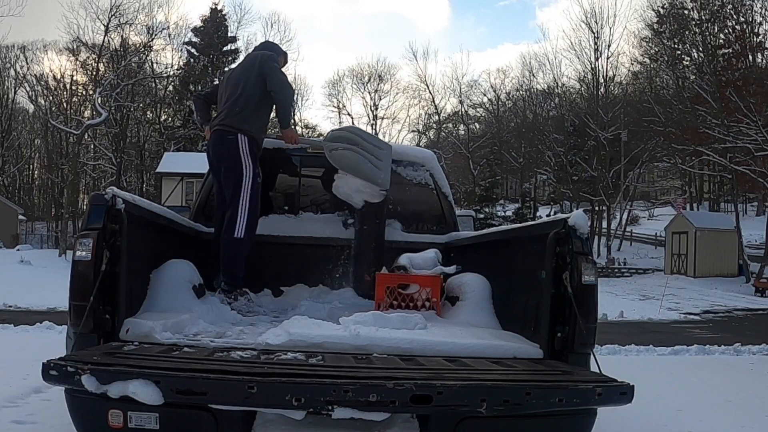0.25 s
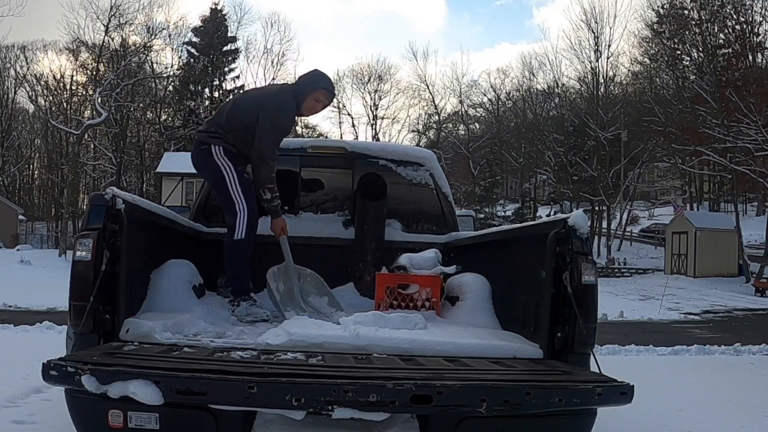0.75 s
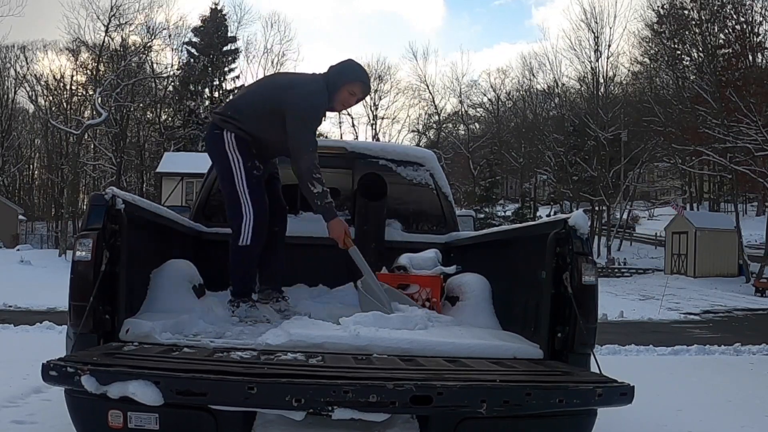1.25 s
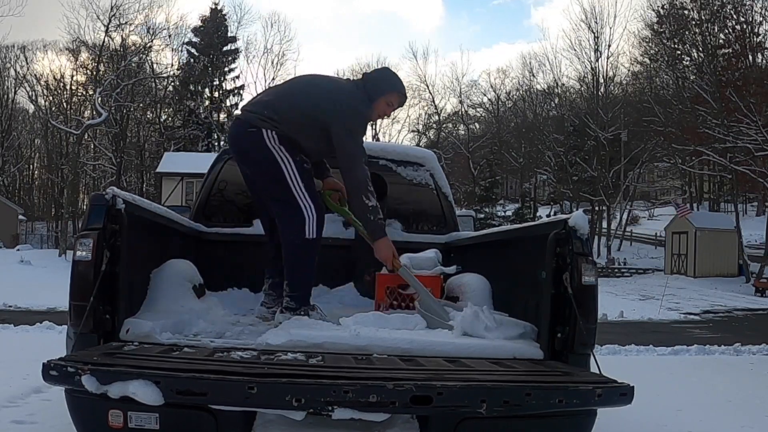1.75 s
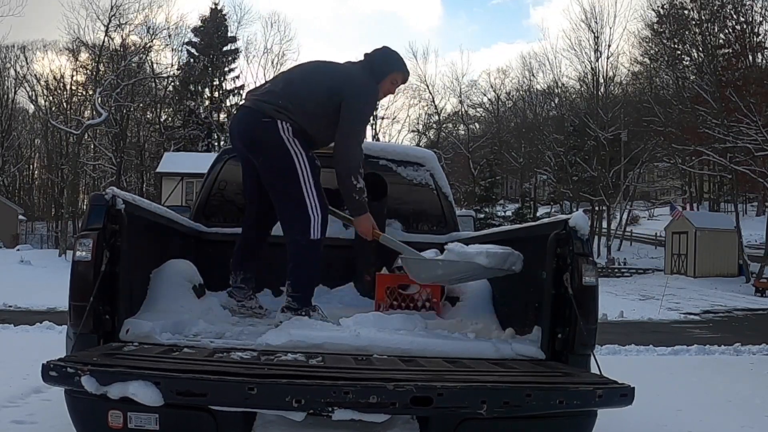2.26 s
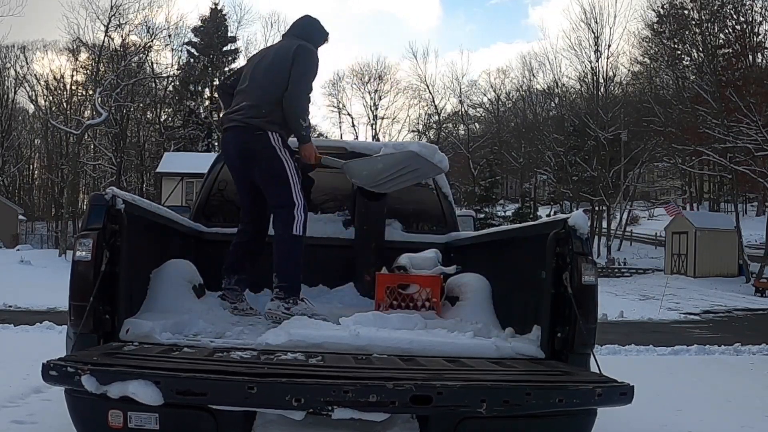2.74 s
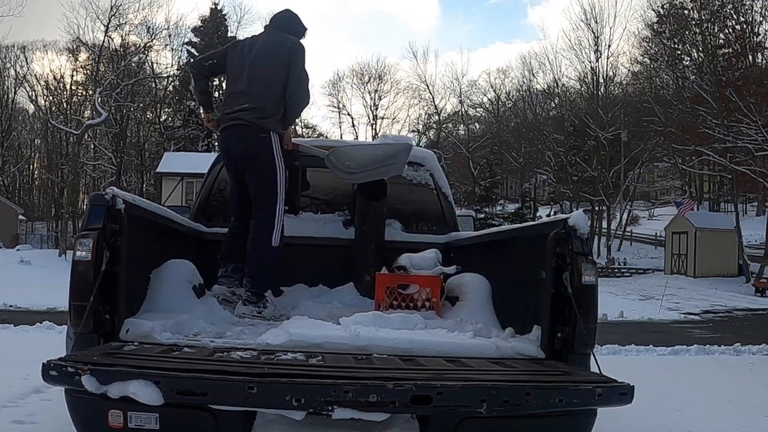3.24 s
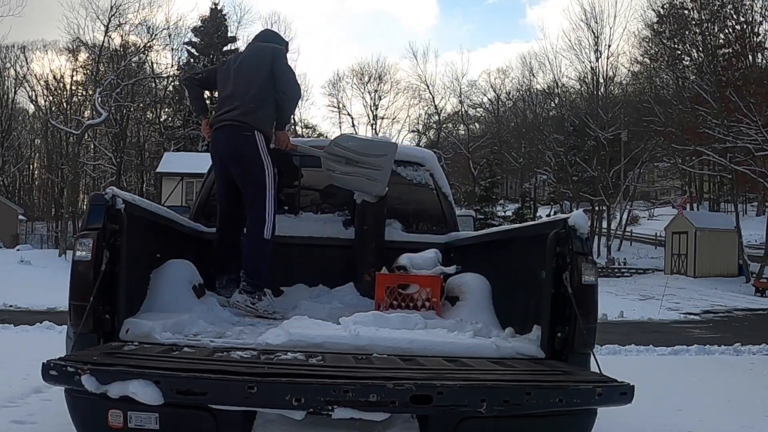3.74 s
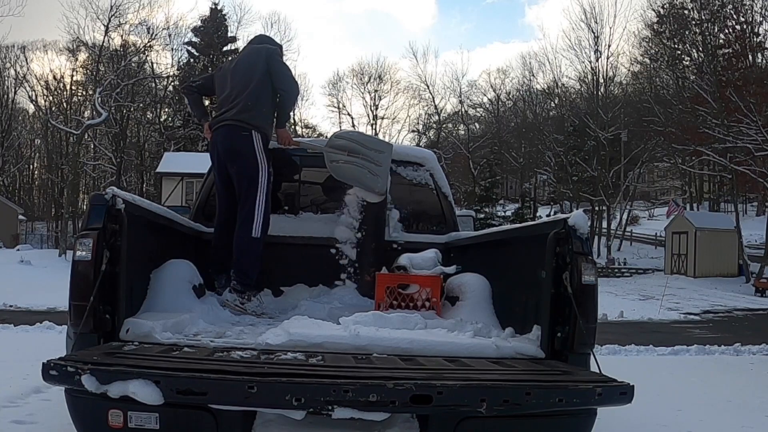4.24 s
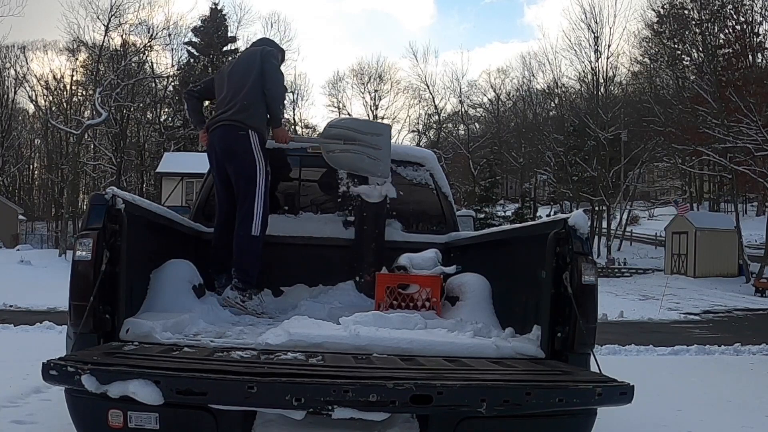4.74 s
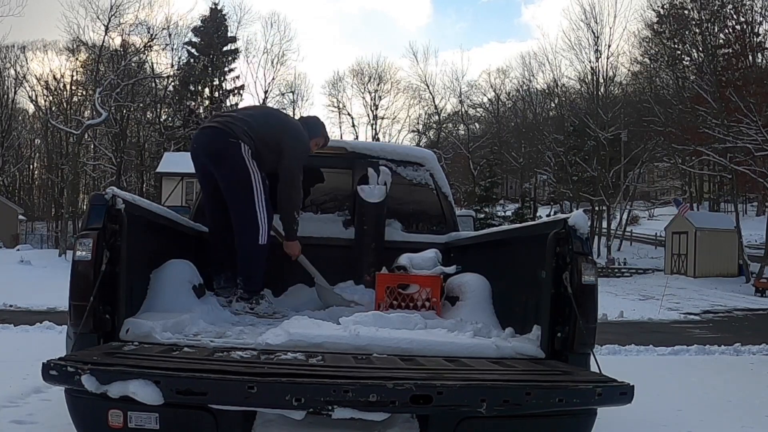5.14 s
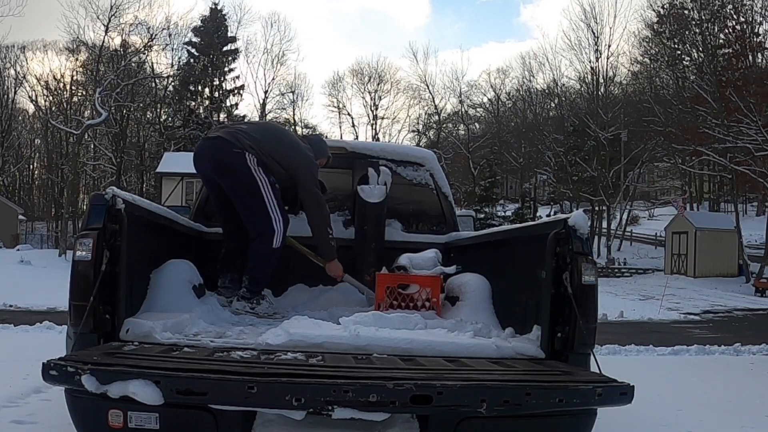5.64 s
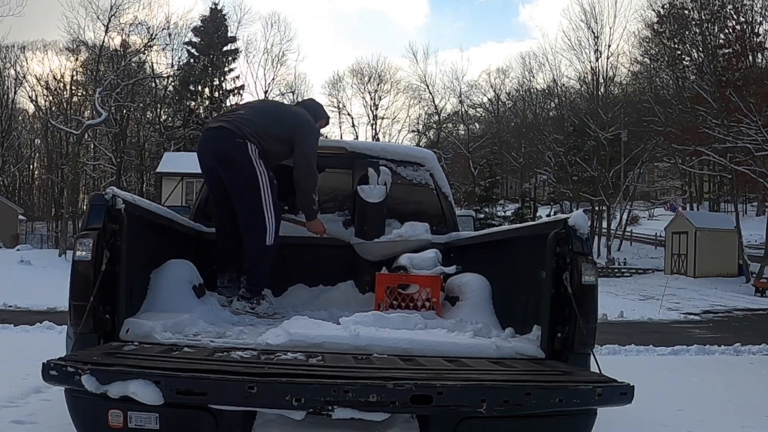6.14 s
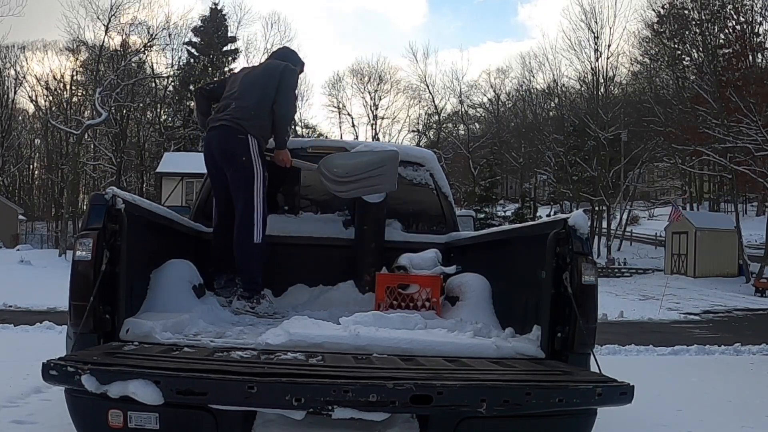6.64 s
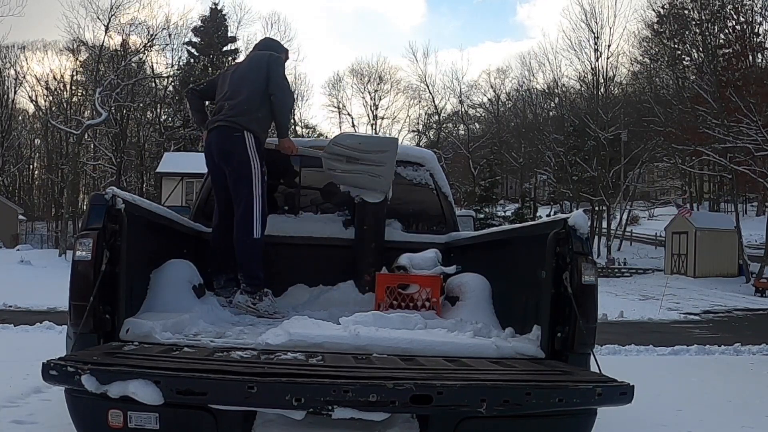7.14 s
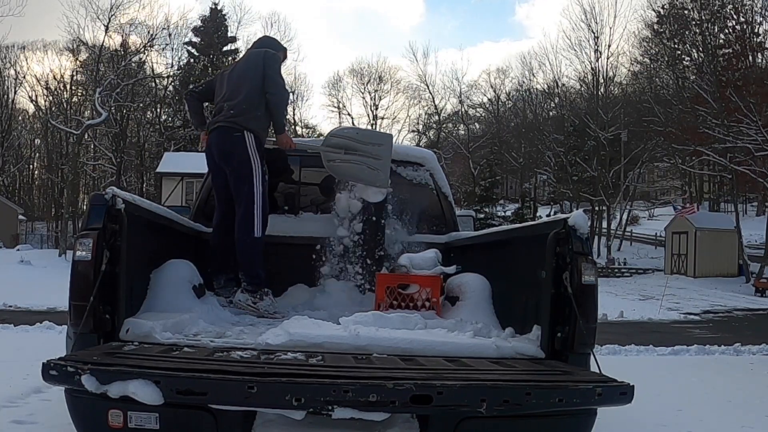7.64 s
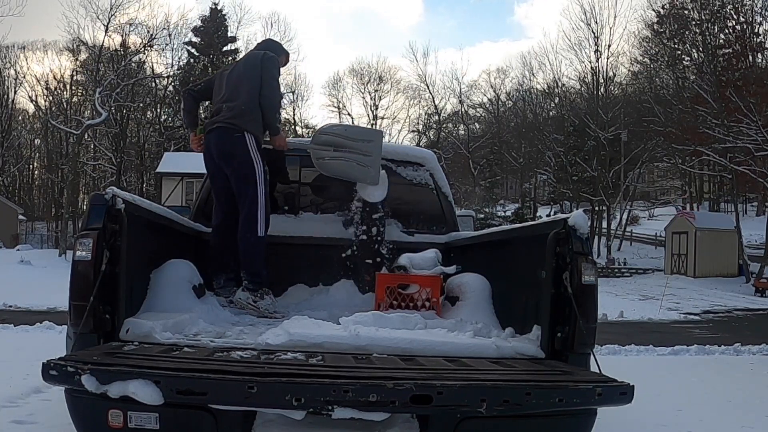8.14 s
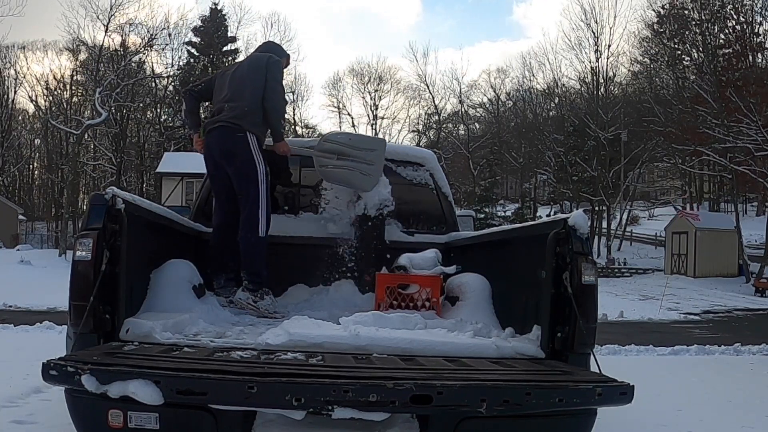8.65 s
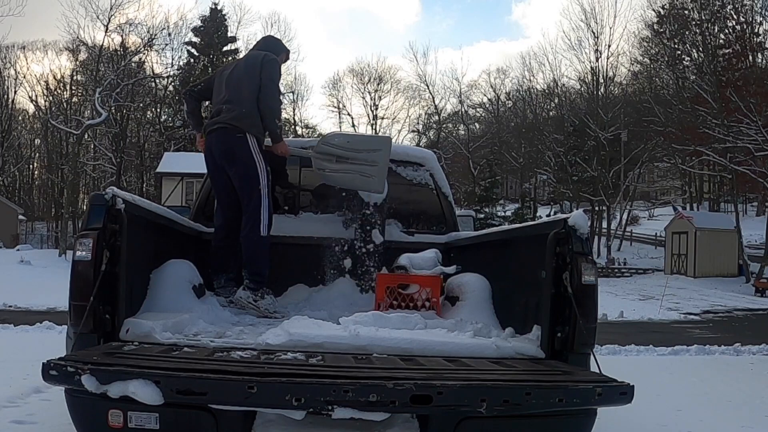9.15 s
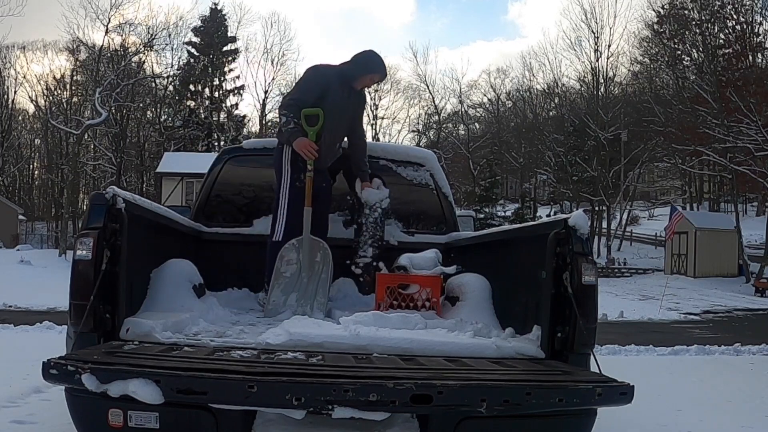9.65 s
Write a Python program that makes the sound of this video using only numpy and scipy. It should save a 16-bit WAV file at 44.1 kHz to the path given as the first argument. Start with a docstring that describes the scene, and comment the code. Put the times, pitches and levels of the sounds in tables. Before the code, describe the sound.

Outdoors in gusty wind, a shovel bites and drags through packed snow on ribbed steel, with dull thuds, clanking knocks and sifting snow.

```python
"""Gusts buffet the microphone first, while tyre roar from a car on a far road swells briefly and fades.
A metal shovel then bites into packed snow on a ribbed truck bed, scrapes it up and is knocked on a steel pipe.
Scrapes and knocks are noise taps and decaying sine rings; loose snow sifts down as grainy noise.
Wind is low noise in lumps with single slow swings; road and still air are shaped noise."""
import sys
import numpy as np
from scipy import signal
from scipy.fft import rfft, irfft, next_fast_len
from scipy.io import wavfile
from scipy.ndimage import uniform_filter1d

SR = 44100
rng = np.random.default_rng(int(sys.argv[2]) if len(sys.argv) > 2 else 0)


def wav_record(signal):
    """Record a signal, one row per channel, as 16-bit PCM in the file named by sys.argv[1]."""
    frames = np.transpose(np.atleast_2d(signal))
    bounded = np.clip(frames, -1, 1)
    # unit amplitude maps onto the largest positive 16-bit level
    quanta = np.round(bounded * 32767).astype(np.int16)
    wavfile.write(sys.argv[1], SR, quanta)


N = 436149  # length in samples

# The sliding blade, one table a stroke, with the snow settling after it:
# t/s, pressure on the snow level/dB, contact with the steel level/dB (relative to the pressure)
SLIDE_STROKES = [
    [(.8, -33, 2), (.87, -42.5, 18), (1.0, -32.5, 9.5), (1.14, -37, 9), (1.22, -39, -1), (1.4, -40.5, 2.5),
     (1.55, -39, -3.5), (1.7, -43, -1.5), (1.82, -37, -2), (1.92, -42, -11), (1.97, -55, -11),
     (2.1, -86, -3)],
    [(4.985, -37, 2), (5.07, -38, 5), (5.3, -32.5, -3.5), (5.5, -39, 0.5), (5.69, -47.5, 1),
     (5.76, -50, 3.5), (5.95, -56.5, -10), (6.3, -58, -13)],
]
# Shares of the slide: bed and blade level/dB (relative to contact), grit and fine grit level/dB (to pressure)
SLIDE_SHARES = [-3, -4.5, -1, -10]
# The edge bites a rib or a crust: t/s, length t/s, then bed, blade and grit level/dB before the bite's fall
EDGE_BITES = [(0.802, 0.023, -15, -12, -27.5), (0.829, 0.024, -15, -15.5, -22),
              (0.881, 0.037, -35, -17.5, -27.5), (0.897, 0.074, -20.5, -20, -31),
              (1.024, 0.014, -33, -20.5, -32), (1.04, 0.011, -20, -24, -22.5),
              (1.063, 0.015, -20, -15.5, -17.5), (1.09, 0.019, -37, -28, -24),
              (1.164, 0.026, -22, -29.5, -42), (1.236, 0.0067, -34, -29, -32.5),
              (1.305, 0.06, -41, -43, -33.5), (1.399, 0.011, -33, -35.5, -43),
              (1.843, 0.031, -28, -33.5, -63), (1.873, 0.026, -28.5, -37, -47),
              (1.904, 0.043, -31, -42, -53), (3.271, 0.012, -33.5, -25, -29.5),
              (3.288, 0.012, -42, -46, -37), (3.305, 0.018, -48, -44, -47), (4.988, 0.016, -30, -27, -41),
              (5.002, 0.028, -32, -21, -33), (5.029, 0.037, -26.5, -16.5, -27),
              (5.106, 0.022, -25, -19.5, -33.5), (5.16, 0.019, -39, -18.5, -29),
              (5.218, 0.036, -28, -22.5, -22.5), (5.26, 0.024, -30, -29.5, -27.5),
              (5.304, 0.055, -36, -27.5, -36.5), (5.38, 0.065, -54, -35, -33.5),
              (5.443, 0.037, -48, -35, -31), (5.516, 0.062, -42, -30.5, -29),
              (5.566, 0.036, -35.5, -30, -23), (5.61, 0.027, -43, -32, -35), (5.665, 0.038, -32, -33, -34)]
# Colour of crushed ice crystals: f/Hz, relative level/dB (per Hz)
ICE_GRIT = [(530, -15.5), (900, -4), (1960, -6.5), (2130, -9.5), (2690, -7.5), (4060, -12), (4500, -14.5),
            (5500, -18.5), (9150, -23.5), (12000, -42), (15000, -51)]
# How the truck bed rings: f/Hz, relative level/dB, time to fall 60 dB t/s
BED_RINGS = [(170, -2, 0.023), (244, 1, 0.034), (322, -3, 0.047), (413.6, -2.5, 0.047)]
# How the shovel blade rings, here and in the blows: f/Hz, relative level/dB, time to fall 60 dB t/s
BLADE_RINGS = [(550, 1.5, 0.029), (629, 1, 0.054), (732, 2.5, 0.018), (833, -6, 0.057), (933, -2, 0.016),
               (1193, -3.5, 0.021), (1305, -7, 0.031), (1454, -12, 0.036), (1710, -15.5, 0.027),
               (1910, -8.5, 0.0096), (2212, -20, 0.067), (3470, -38, 0.02), (4170, -41, 0.022)]


def scrape():
    """Cracking crystals tap the bed and the blade, which ring on, while crushed snow gives off grit noise."""
    bite_fine_db, bite_fall_db_per_s, bite_release_s = -15, 126, 0.0081  # fine grit is relative to grit
    # four rows of force: bed, blade, grit, fine grit
    force = np.zeros((4, N))
    for stroke in SLIDE_STROKES:
        snow_db, steel_db = curve(stroke)
        contact_db = snow_db + steel_db
        force += undb([contact_db, contact_db, snow_db, snow_db])
    force *= undb(SLIDE_SHARES)[:, None]

    t = np.arange(N) / SR
    rise = np.array([[.15], [.14], [.45], [.8]])  # share of the bite; the fine grit builds last
    for s, length, bed_db, blade_db, grit_db in EDGE_BITES:
        span = slice(int(s * SR), int((s + length + .15) * SR))
        u = t[span] - s
        grip = np.clip(u / (rise * length), 0, 1)
        grip = grip * undb(-bite_fall_db_per_s * np.clip(u, 0, length))
        release = np.exp(-np.clip(u - length, 0, None) / bite_release_s)
        parts = undb([bed_db, blade_db, grit_db, grit_db + bite_fine_db])[:, None]
        force[:, span] += parts * grip * release

    chatter = walk(90.)  # the edge sticks and slips
    blade_cracks = unit(undb(1.26 * chatter) * grains(1.95))
    bed_cracks = unit(undb(0.43 * chatter) * grains(2.24))
    crushed = unit(grains(2.9)) + .5 * rng.standard_normal(N)
    grit, fine = split(colour(undb(1.2 * chatter) * crushed, ICE_GRIT), 5000)

    # crystals of each size break in their own clusters
    edges_hz = 400 * 1.4 ** np.arange(10)
    clusters = np.zeros(N)
    for pair in zip(edges_hz, edges_hz[1:]):
        sos = signal.butter(2, pair, "band", fs=SR, output="sos")
        clusters += undb(1.3 * walk(160.)) * signal.sosfiltfilt(sos, grit)
    grit = unit(clusters)
    fine = unit(undb(2. * walk(40.)) * fine)  # powder squeezes out in its own time

    bed = struck(force[0] * bed_cracks, BED_RINGS)
    blade = struck(force[1] * blade_cracks, BLADE_RINGS)
    return bed + blade + force[2] * grit + force[3] * fine


# Boots and blade thud on the steel: t/s, level/dB (before the soft onset), f/Hz
STEEL_THUDS = [(0.352, -10, 273), (2.638, -17, 256), (3.037, -9, 291), (3.276, -14, 235), (3.794, -19, 288),
               (3.822, -17, 281), (7.1822, -5.5, 236), (7.202, -19, 257), (8.627, -2, 289),
               (8.641, -13, 267)]


def thuds():
    """A hollow knock of steel: a low ring and a weaker overtone, both short, with a soft start."""
    out, t = np.zeros(N), np.arange(SR // 4) / SR
    for s, db, hz in STEEL_THUDS:
        overtone = 0.27 * ring(t, 1.72 * hz, 0.034)
        thud = (overtone - ring(t, hz, 0.039)) * (1 - np.exp(-t / 0.0028))
        out[int(s * SR):int(s * SR) + len(t)] += undb(db) * thud
    return out


# The blade strikes the pipe: t/s, then blade, pipe and snow crunch level/dB (before their own
# rise and fade), crunch time scale t/s (60 dB down by then)
PIPE_BLOWS = [(7.182, -21.5, -36, -36, 0.033), (7.202, -36, -55, -40, 0.078),
              (8.628, -17, -8, -21.5, 0.042), (8.641, -15, -32, -28, 0.07)]
# How the pipe rings before the snow chokes it: f/Hz, relative level/dB, time to fall 60 dB t/s
PIPE_RINGS = [(1045, 0, .11), (1367, -8, .05), (1810, -13, .04), (2600, -17, .03)]


def blows():
    """Blade and pipe ring briefly together, and the knock shakes loose a crunch of snow."""
    out, t = np.zeros(N), np.arange(SR // 4) / SR
    crunch = colour(grains(1.8), ICE_GRIT)
    # the wall swings up, then snow inside chokes it
    pipe = modes(PIPE_RINGS) * (1 - np.exp(-t / 0.0024)) * np.exp(-(t / 0.026) ** 2)
    blade = np.gradient(modes(BLADE_RINGS))  # a blow on hard steel is sudden and favours the high modes
    blade = blade / np.max(np.abs(blade))
    blade = blade * (1 - np.exp(-t / 0.00031)) * np.exp(-t / 0.02)  # snow on the blade deadens it
    for s, blade_db, pipe_db, crunch_db, crunch_t60 in PIPE_BLOWS:
        span = slice(int(s * SR), int(s * SR) + len(t))
        fade = np.exp(-np.log(1000) * (t / crunch_t60) ** 1.16) * (1 - np.exp(-t / 0.002))
        out[span] += undb(blade_db) * blade + undb(pipe_db) * pipe
        out[span] += undb(crunch_db) * fade * crunch[span]
    return out


# The bare edge clicks on steel: t/s, level/dB (before the onset), f/Hz
EDGE_TICKS = [(0.85, -9.5, 3480), (1.041, -8, 3000), (1.048, -16, 3400), (1.069, -7, 2750),
              (1.077, -4, 3870), (1.239, -19, 2790), (5.038, -17, 2300), (5.117, -25, 3800),
              (5.168, -25, 3000), (5.222, -21, 2630), (5.444, -17, 2000), (5.57, -12, 1660),
              (5.579, -21, 2970), (7.182, -31, 2920), (8.627, -11, 3420), (8.627, -15, 4780)]
# The upper ring of a click: multiple of its f/Hz, relative level/dB
UPPER_RING = (1.9, -20)


def ticks():
    """Two quick high rings make each click; a higher pitch dies away sooner."""
    out, t = np.zeros(N), np.arange(SR // 4) / SR
    multiple, upper_db = UPPER_RING
    for s, db, hz in EDGE_TICKS:
        t60 = 24 / hz  # 24 cycles until the ring is 60 dB down
        tick = ring(t, hz, t60) + undb(upper_db) * ring(t, multiple * hz, t60)
        out[int(s * SR):int(s * SR) + len(t)] += undb(db) * tick * (1 - np.exp(-t / 0.00071))
    return out


def knocks():
    """Thuds, blows and clicks, and their faint smeared return from a house front."""
    delay_s, smear_s, house_db = .092, .013, -41  # the return peaks one smear after the delay
    out, t = thuds() + blows() + ticks(), np.arange(SR // 4) / SR
    front = band(rng.standard_normal(len(t)), 520.0, 1800.0)
    front = front * np.exp(-((t - delay_s - smear_s) / smear_s) ** 2)
    return out + undb(house_db) * through(out, front)


# Loose snow sifting off the blade: start t/s, length t/s, then clumps, crumbs and powder level/dB
SNOW_FALLS = [(2.802, 0.13, -50, -64, -76), (3.033, 0.13, -44.5, -58, -68), (3.71, 0.28, -49.5, -64, -62),
              (3.971, 0.14, -49, -58.5, -56.5), (4.102, 0.25, -50.5, -59, -60.5),
              (4.688, 0.09, -50.5, -59, -64), (9.466, 0.194, -52.5, -60, -84), (9.673, 0.2, -72, -68, -63)]


def sifting():
    """Clumps plop, crumbs patter and powder hisses: each is grainy noise in its own pitch range."""
    t = np.arange(N) / SR
    rise_s, fade_s = 0.033, 0.12
    levels = np.zeros((3, N))
    for s, length, *parts_db in SNOW_FALLS:
        # each ramp is halfway at the listed start or end
        ramps = np.minimum((t - s) / rise_s, (s + length - t) / fade_s)
        levels += undb(parts_db)[:, None] * np.clip(ramps + .5, 0, 1)
    clumps, crumbs, fine = levels
    powder = grains(2.5)
    hiss = band(powder, 4000.0, 8300.0) + 0.27 * band(powder, 7200.0, 8200.0)
    plops = clumps * band(grains(2.25), 240.0, 1150.0)
    patter = crumbs * band(grains(1.9), 2370.0, 3860.0)
    return undb(0.66 * walk(27.0)) * (plops + patter + fine * unit(hiss))


def truck_wash(work):
    """The bed walls and the cab send back a short dull wash, starting 6 ms late."""
    t = np.arange(SR // 5) / SR
    wash = band(rng.standard_normal(len(t)), 133.0, 2500.0, order=1)
    wash = wash * np.exp(-np.log(1000) * t / 0.15) * (t > .006)
    return undb(-23.5) * through(work, wash)


# Gusts at the microphone: t/s, rumble level/dB, upper rumble level/dB (relative to the rumble)
WIND_GUSTS = [(0.0, -18.5, -3), (0.27, -21, -15), (0.47, -24.5, -5.5), (0.69, -20, -13.5), (0.74, -29, 8),
              (1.73, -34.5, 0.5), (2.15, -25, -10.5), (2.42, -35.5, -13), (3.11, -32.5, -1.5),
              (3.22, -27, 0), (4.02, -31.5, -8.5), (4.13, -28.5, -22), (4.16, -31, -15.5), (4.68, -32, -1),
              (4.85, -22, -16), (5.04, -33, 8.5), (5.12, -21.5, -4), (5.32, -18.5, -1), (5.37, -25.5, -1),
              (6.38, -35, -1), (6.62, -31.5, -1.5), (6.72, -40, 0), (6.97, -36.5, -7), (7.12, -43, -6),
              (7.42, -49, -1), (7.49, -36, -14), (7.6, -46, -6), (7.66, -37, -5.5), (8.14, -51, 1.5),
              (8.26, -39.5, -5), (8.43, -26, -8), (8.62, -24.5, 1.5), (8.8, -34, -4.5), (9.0, -40, -7),
              (9.28, -47, -0.5), (9.78, -35, -4.5), (9.89, -48, -15)]
# Single strong eddies: middle t/s, level/dB (of the main swing), f/Hz
STRONG_EDDIES = [(0.048, -12.5, 79.4), (0.256, -12.5, 70), (0.36, -8, 80), (0.712, -12.5, 73),
                 (1.119, -14.5, 77), (1.425, -20.5, 109), (2.144, -18.5, 86), (2.597, -25.5, 57.7),
                 (3.201, -11.5, 98.6), (3.279, -17, 81), (3.422, -15.5, 73), (3.647, -22, 90),
                 (4.379, -24.5, 85), (5.146, -11.5, 77.4), (5.243, -7, 119), (5.267, -9, 110),
                 (5.303, -6.5, 95), (5.534, -16, 89), (5.826, -17.5, 70), (8.43, -17, 81.6),
                 (8.579, -17.5, 74)]


def wind():
    """Eddies thump the microphone: the rumble comes in lumps, the upper part more so."""
    eddy_cycles = 0.87  # a swing fades to 1/e this many cycles from its middle
    low_db, upper_db = curve(WIND_GUSTS)
    lumps = walk(14.)
    low = unit(undb(1.7 * lumps + 0.65 * walk(5.0)) * band(rng.standard_normal(N), 24.9, 61.2))
    flaps = undb(2.0 * lumps + 3.54 * walk(25.))
    flutter = band(rng.standard_normal(N), 62.6, 147.4)
    flutter = flutter + 0.11 * band(rng.standard_normal(N), 138.0, 258.0)
    upper = unit(flaps * flutter)
    out = undb(low_db) * (low + undb(upper_db) * upper)

    u = np.arange(-SR // 10, SR // 10) / SR
    for (s, db, hz), turn in zip(STRONG_EDDIES, rng.random(len(STRONG_EDDIES))):
        swing = np.sin(2 * np.pi * (hz * u + turn))
        lopsided = swing + 0.29 * (2 * swing ** 2 - 1)  # pushes differ from pulls
        eddy = undb(db) * np.exp(-(hz * u / eddy_cycles) ** 2) * lopsided
        at = int(s * SR) - SR // 10
        out[max(at, 0):at + len(u)] += eddy[max(-at, 0):]
    return out


def road():
    """Tyre roar round 1 kHz, and hiss above it, weaken with the car's distance over snow and trees."""
    passes_s, nearest_m, speed_m_s = 0.53, 17, 8.62
    roar_db, roar_loss_db_per_m = -38, 0.96
    hiss_db, hiss_loss_db_per_m = -10, 2.5  # hiss level before the roar level is applied
    screen_db_per_s = 16  # the truck hides the tyre hiss while the car draws near
    t = np.arange(N) / SR
    away_m = np.hypot(nearest_m, speed_m_s * (t - passes_s))
    extra_m = away_m - nearest_m
    roar = undb(0.27 * walk(2.0)) * band(rng.standard_normal(N), 450.0, 1266.0)
    roar = roar + .5 * band(rng.standard_normal(N), 864.0, 1116.0)
    hiss = band(band(rng.standard_normal(N), 790.0, 4500.0, order=3), 400., 9000., order=4)
    hidden_db = screen_db_per_s * np.clip(passes_s - t, 0, None)
    car = undb(-roar_loss_db_per_m * extra_m) * roar
    car = car + undb(hiss_db - hiss_loss_db_per_m * extra_m - hidden_db) * hiss
    return undb(roar_db) * nearest_m / away_m * car


# Colour of the still air and the microphone's own hiss: f/Hz, relative level/dB (per Hz)
STILL_AIR = [(170, -7), (200, -2), (300, -4.5), (480, -13), (850, -14.5), (1460, -18), (1750, -24),
             (7700, -28.5), (9500, -34.5), (10800, -42), (14000, -58), (15100, -64)]


def still_air():
    """Quiet air and the microphone's own hiss: steady shaped noise that wavers slightly."""
    return undb(-50) * undb(0.24 * walk(19.0)) * colour(rng.standard_normal(N), STILL_AIR)


def undb(db):
    """Turn decibels into a plain multiplier."""
    return 10 ** (np.asarray(db) / 20)


def unit(x):
    """Scale a sound to rms 1."""
    return x / np.sqrt(np.mean(x ** 2))


def curve(rows, silent_db=-120):
    """Draw straight lines through each column of a timed table; silence outside its span."""
    s, *columns = np.transpose(rows)
    return [np.interp(np.arange(N) / SR, s, c, silent_db, silent_db) for c in columns]


def colour(x, points):
    """Filter by (f/Hz, level/dB) points, with -90 dB outside them; rms 1."""
    hz, db = np.transpose(points)
    size = next_fast_len(N)
    log_f = np.log(np.arange(size // 2 + 1) * SR / size + 1)
    gain = undb(np.interp(log_f, np.log(hz), db, -90, -90))
    return unit(irfft(rfft(x, size) * gain, size)[:N])


def band(x, lo_hz, hi_hz, order=2):
    """Keep the pitches between two limits; rms 1."""
    return unit(signal.sosfilt(signal.butter(order, [lo_hz, hi_hz], "band", fs=SR, output="sos"), x))


def split(x, hz):
    """The parts below and above a frequency; rms 1 each."""
    return [unit(signal.sosfilt(signal.butter(3, hz, kind, fs=SR, output="sos"), x))
            for kind in ("low", "high")]


def walk(rate):
    """Random levels held 1 / rate s and smoothed twice; rms 1."""
    k = int(SR / rate)
    steps = np.repeat(rng.standard_normal(N // k + 1), k)
    return unit(uniform_filter1d(uniform_filter1d(steps, k), k)[:N])


def grains(spread_db):
    """A crack on every sample, a few far larger than the rest."""
    return rng.standard_normal(N) * undb(spread_db * rng.exponential(size=N))


def ring(t, hz, t60):
    """A sine that falls 60 dB in t60 seconds."""
    return np.sin(2 * np.pi * hz * t) * np.exp(-np.log(1000) * t / t60)


def modes(table):
    """What a body rings with after one sharp tap."""
    t = np.arange(SR // 4) / SR
    return sum((-1) ** k * undb(db) * ring(t, hz, t60) for k, (hz, db, t60) in enumerate(table))


def through(x, response):
    """Send a sound through a response scaled to total energy 1."""
    return signal.fftconvolve(x, response / np.sqrt(np.sum(response ** 2)))[:N]


def struck(x, table):
    """A stream of taps sets a body ringing, at the power of the taps."""
    return through(x, modes(table))


def scene():
    """The shovel work and its wash in front of the wind, the road and the still air."""
    work = scrape() + knocks() + sifting()
    return (work + truck_wash(work) + wind() + road() + still_air())[None]


def record(dry):
    """The input rounds the loudest peaks, then a steep filter cuts the treble above 15.2 kHz."""
    rounded = np.tanh(.6 * dry) / .6
    return signal.sosfilt(signal.ellip(8, .2, 70, 15200, fs=SR, output="sos"), rounded)


dry = scene()
out = record(dry)
wav_record(out)
```